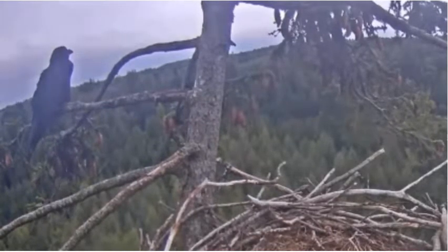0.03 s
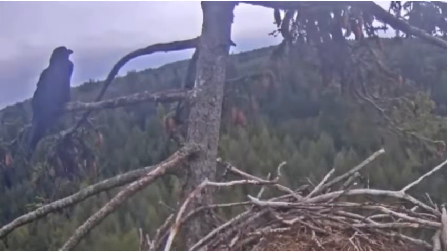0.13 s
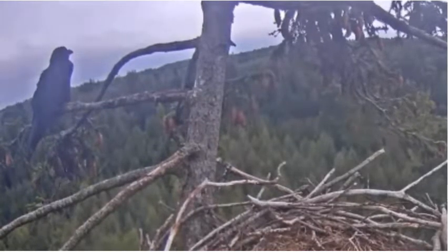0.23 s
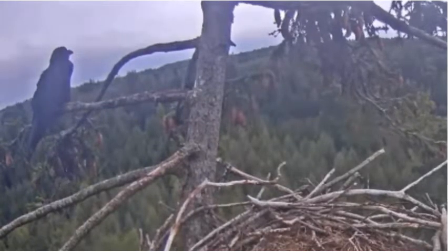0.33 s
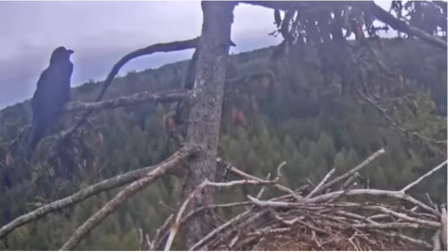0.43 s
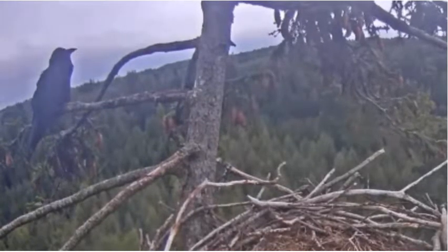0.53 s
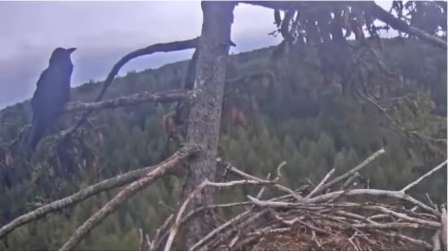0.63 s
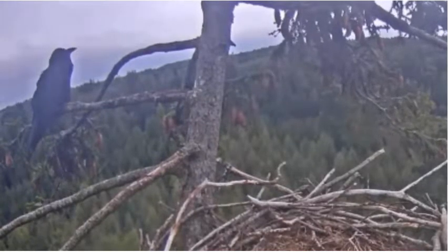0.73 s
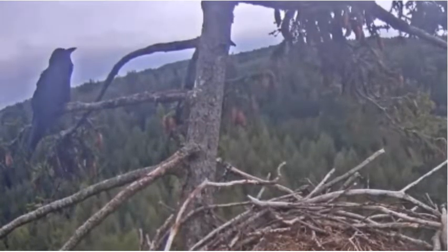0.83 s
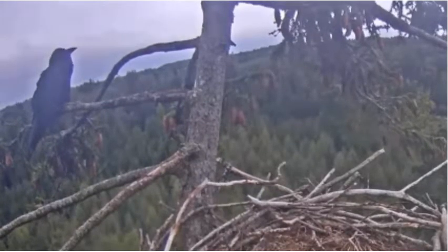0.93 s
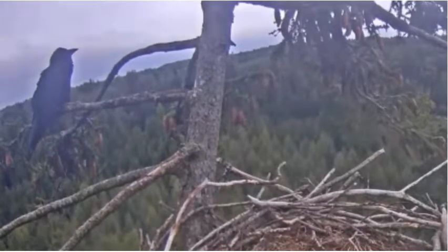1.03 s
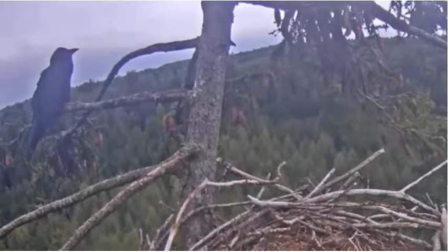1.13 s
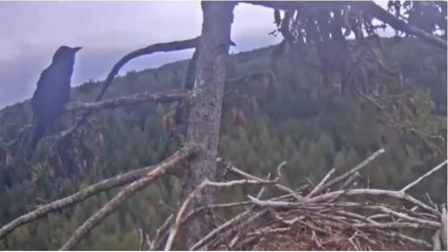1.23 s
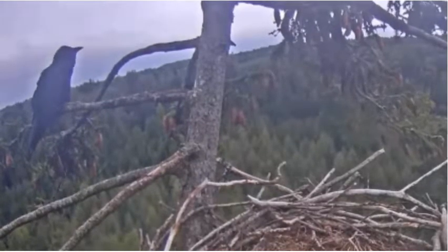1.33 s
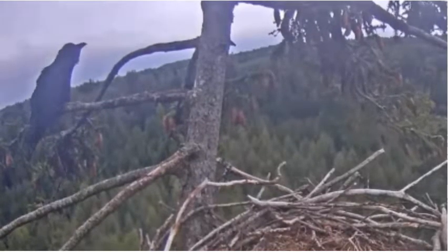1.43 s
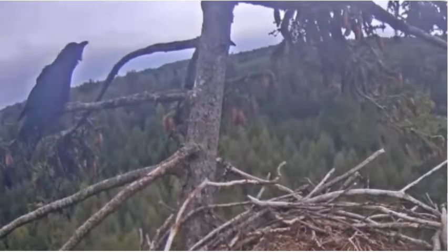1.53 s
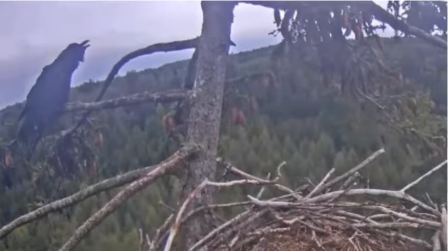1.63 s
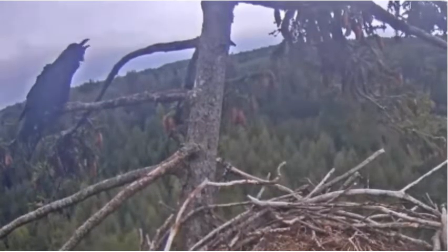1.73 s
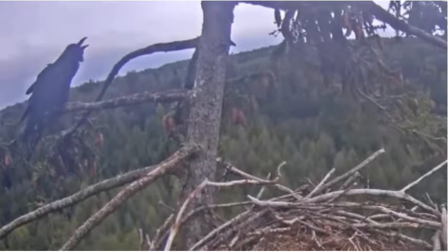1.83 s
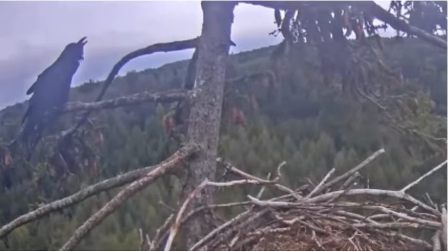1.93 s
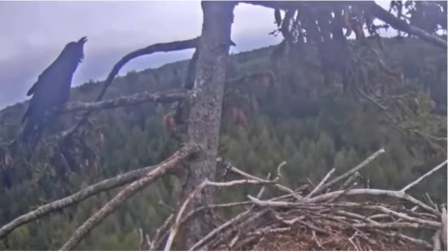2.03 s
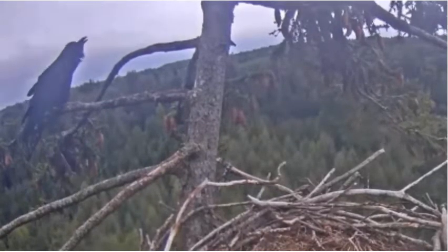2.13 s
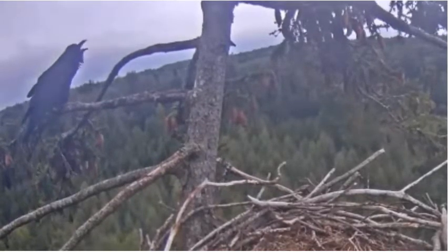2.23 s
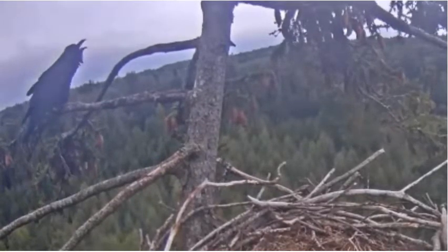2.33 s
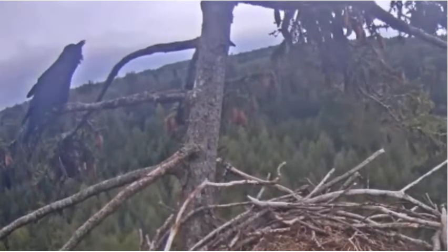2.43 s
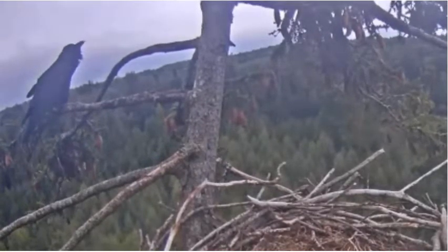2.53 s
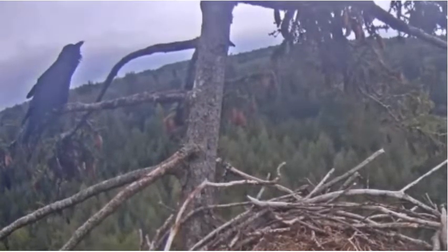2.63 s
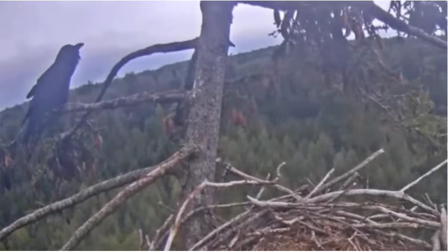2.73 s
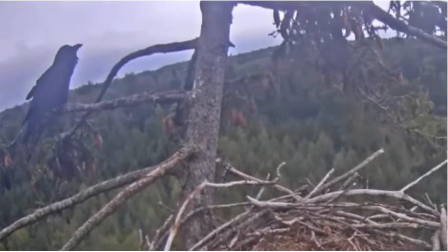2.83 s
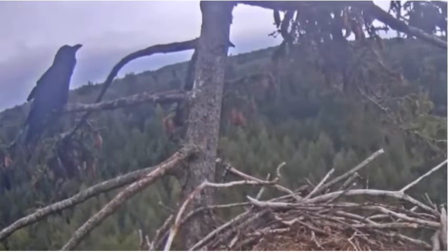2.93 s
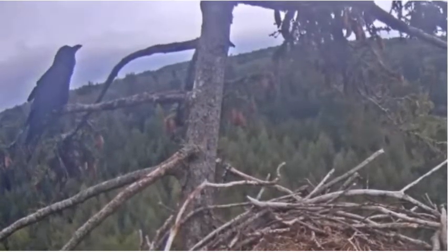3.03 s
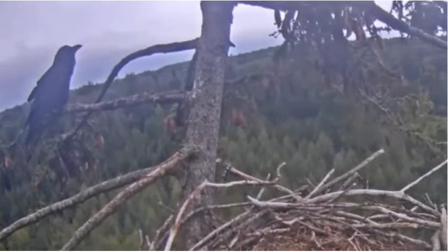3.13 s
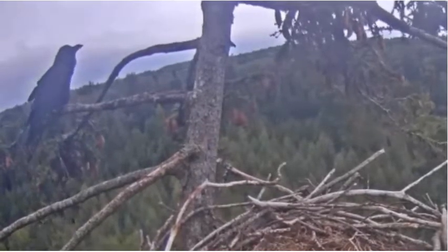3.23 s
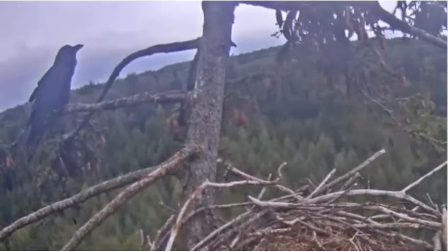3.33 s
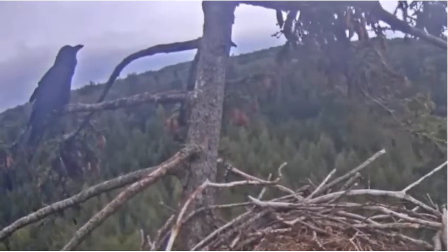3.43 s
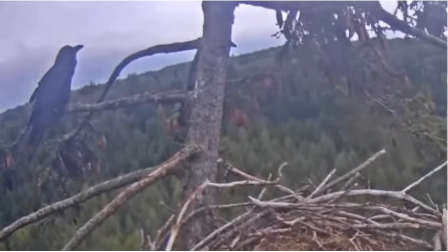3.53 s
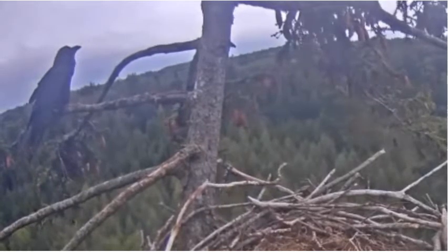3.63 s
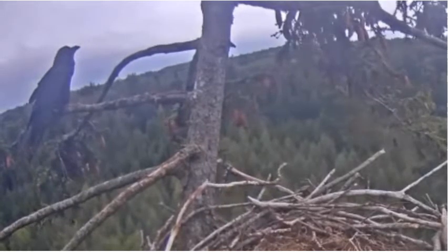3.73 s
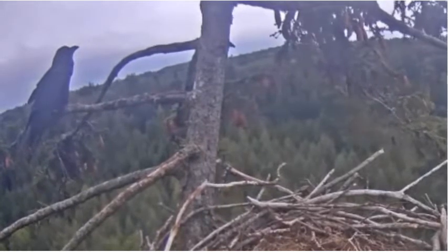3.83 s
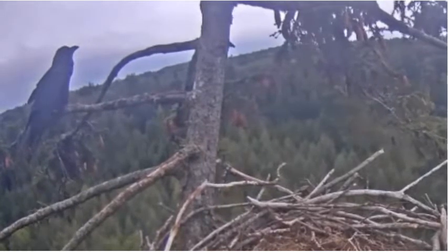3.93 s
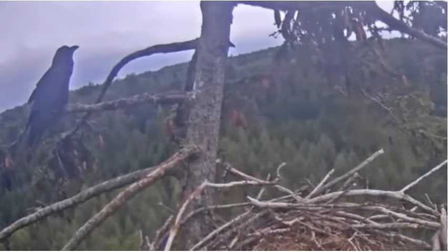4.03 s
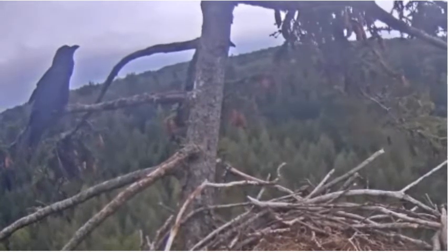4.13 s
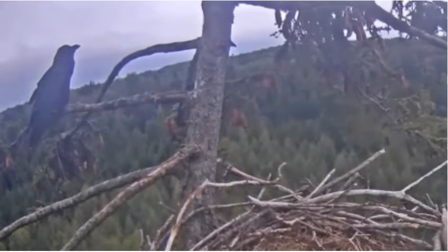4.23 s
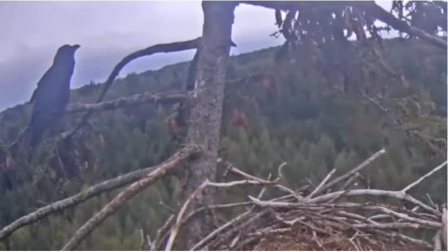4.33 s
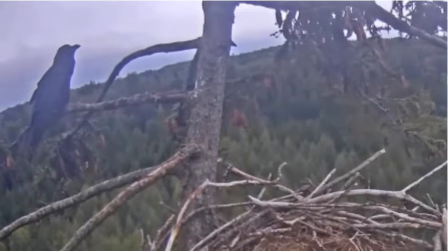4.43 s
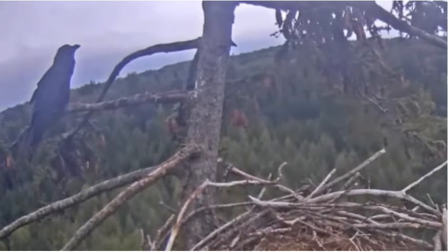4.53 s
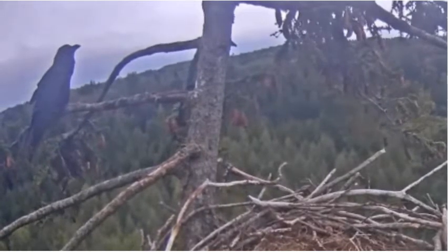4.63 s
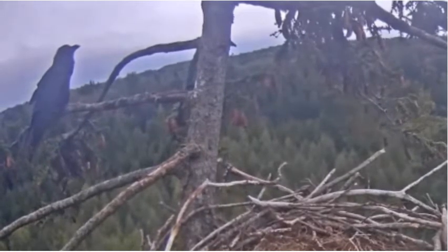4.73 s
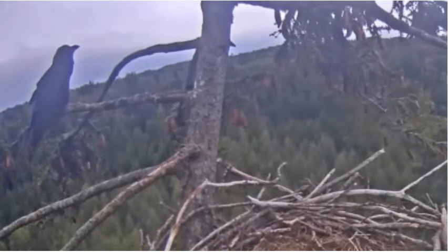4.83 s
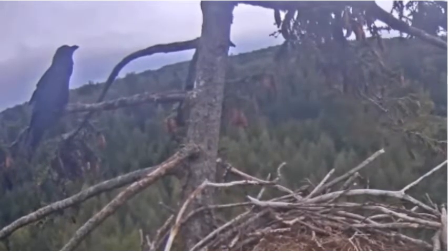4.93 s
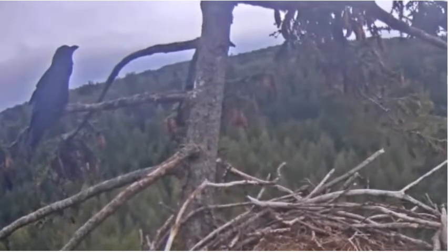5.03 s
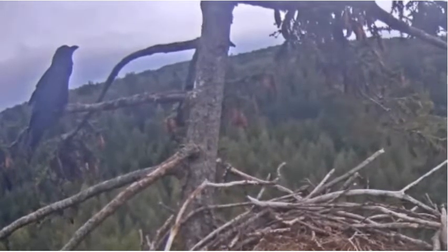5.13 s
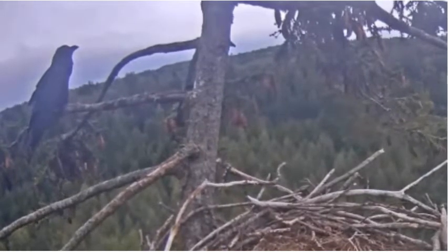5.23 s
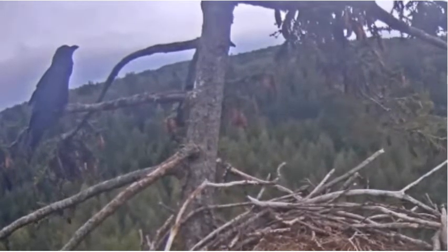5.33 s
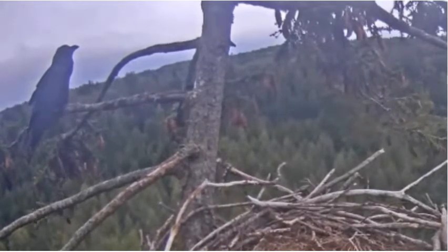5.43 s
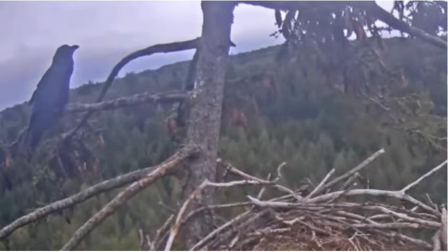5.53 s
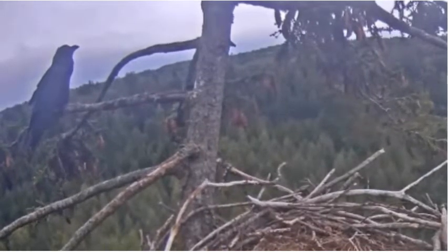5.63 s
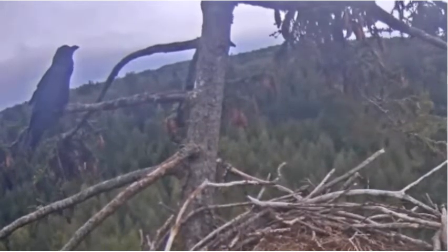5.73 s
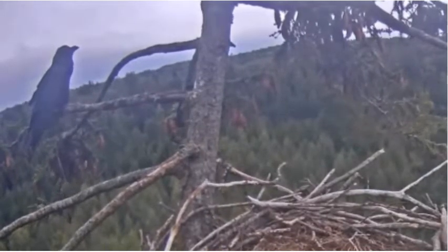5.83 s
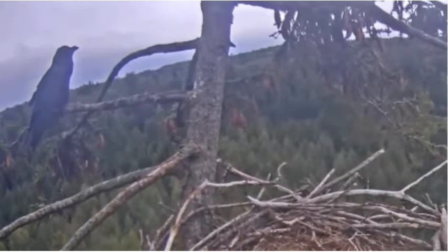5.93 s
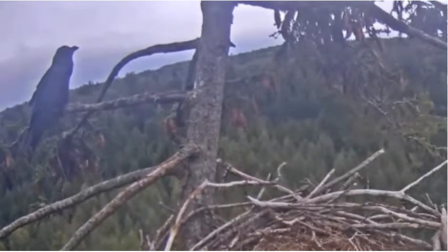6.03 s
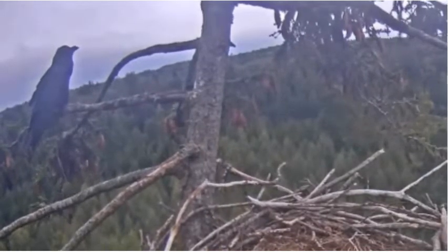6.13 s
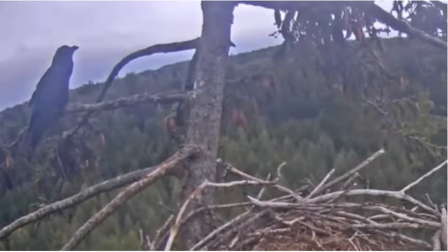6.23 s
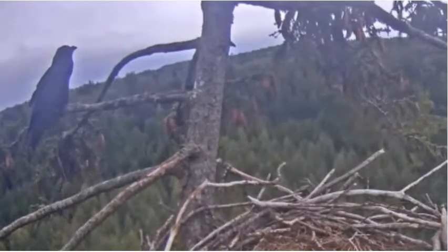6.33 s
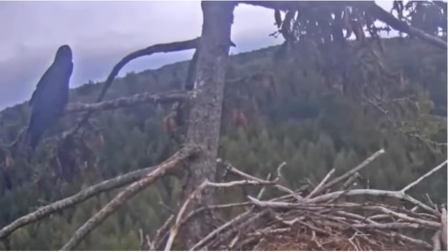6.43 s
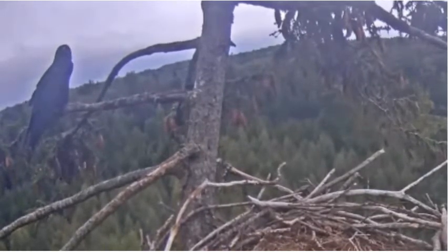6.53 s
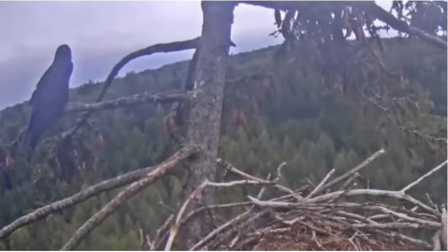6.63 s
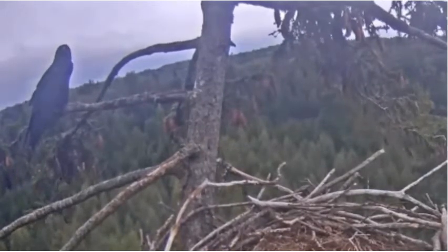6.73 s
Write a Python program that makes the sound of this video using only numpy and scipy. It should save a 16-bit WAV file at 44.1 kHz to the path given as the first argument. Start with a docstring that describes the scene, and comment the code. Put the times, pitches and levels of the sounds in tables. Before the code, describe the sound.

Over constant hiss and wind rumble, a large raven croaks twice loudly, then four times quietly, with short forest echoes trailing.

```python
"""On a forested hillside, a raven on a conifer branch gives two loud croaks, then four softer ones.
A croak is a click and a quick roll of bursts of syrinx pulses that ring the throat, windpipe and beak
and sink in pitch at the end; decaying coloured noise, convolved with each call, is the forest's answer.
Shaped noise gives steady microphone hiss, low wind rumble and rustling trees, louder in one long gust.
A soft low thump comes early, and all sound cuts out twice for a few milliseconds."""
import sys
import numpy as np
from scipy import signal
from scipy.fft import rfft, irfft, next_fast_len
from scipy.io import wavfile
from scipy.ndimage import map_coordinates

SR = 44100
rng = np.random.default_rng(int(sys.argv[2]) if len(sys.argv) > 2 else 0)


def inscribe(sig):
    """Save sig as 16-bit PCM at rate SR to the path in sys.argv[1].

    A 1-D sig is mono; a 2-D sig holds one channel per row.
    Samples are clipped to [-1, 1] before scaling.
    """
    pcm = np.round(np.clip(np.atleast_2d(sig).T, -1, 1) * 32767)
    wavfile.write(sys.argv[1], SR, pcm.astype(np.int16))


N = 298998

# Noise spectra before scaling to rms 1. Each row: frequency in Hz, relative level in dB.
HISS_SPECTRUM = [(71, -38), (120, -14), (283, -5.5), (312, -4.5), (447, -5), (484, -8), (556, -5.5),
                 (1090, -11.5), (1600, -12.5), (2380, -6), (2740, -13.5), (3690, -21), (7260, -25.5),
                 (12700, -26.5), (14000, -30)]
RUMBLE_SPECTRUM = [(7.1, -10.5), (12, 10.5), (25, -7.5), (52, -11), (124, -24), (250, -29.5), (320, -34.5),
                   (550, -120)]
RUSTLE_SPECTRUM = [(60, -40), (150, -14), (450, 2.5), (900, -3.5), (2000, -8.5), (5000, -39)]
# Colour of the scattered echo. Each row: frequency in Hz, relative level in dB.
ECHO_COLOUR = [(200, 2.5), (500, -2.5), (950, -3), (1120, 3.5), (1240, -3), (1500, 2), (1900, 6.5),
               (2800, -4), (5000, -7.5), (10000, -5.5)]
# A brief offset of the signal. One row: start in seconds, length in seconds, peak in dB.
THUMP = (.935, .003, -32)
# Silences. Each row: start in seconds, end in seconds.
DROPOUTS = [(1.958, 1.963), (2.2185, 2.2235)]
# Croaks. Each row: main click in seconds, relative level in dB, relative level of the pulse edges in dB,
# pitch of the roll in Hz, treble gain of the edges in dB, gain reached at the last burst in dB.
LOUD_CROAKS = [(1.868, -6, 0, 486, -1.5, 1), (2.3435, -6.7, 0, 487, -2, -3)]
SOFT_CROAKS = [(3.3275, -21, -1, 486, 1, 0), (3.7295, -21, .5, 483, 0, 0), (4.165, -21, 1.5, 479, -.5, 0),
               (4.6045, -20, 0, 476, -7, 0)]
# Throat resonances. Each row: centre in Hz, width in Hz, gain in dB.
LOUD_THROAT = [(309, 160, -13.5), (1113, 65, -4), (1221, 83, -0.5)]
SOFT_THROAT = [(327, 290, -17.5), (1110, 340, -9), (1202, 103, -1.5)]
# Windpipe and beak resonances, rung by the pulse edges. Each row: centre in Hz, width in Hz, gain in dB.
LOUD_BEAK = [(497, 150, -11), (1050, 73, -17), (1340, 96, -26), (1880, 110, -7), (2480, 210, -21.5),
             (2700, 160, -24), (3710, 200, -29), (4170, 240, -32.5), (4800, 430, -37), (5800, 1100, -37.5)]
SOFT_BEAK = [(490, 130, -13.5), (1550, 250, -25), (1840, 91, -14), (2490, 340, -10), (2723, 83, -4),
             (3810, 310, -18.5), (4260, 250, -22.5), (4690, 300, -20), (5800, 1400, -30.5)]
# What the bird radiates toward the listener. Each row: frequency in Hz, gain in dB.
LOUD_BEAM = [(150, -16), (380, 0), (2850, 0), (3150, -13), (3700, -6), (5000, -8), (6300, -20), (8000, -36)]
SOFT_BEAM = [(150, -12), (380, 0), (2950, 0), (3300, -14), (3750, -2), (5000, -3), (6500, -6), (8000, -24)]

HISS_DB = -50.5
RUMBLE_DB, RUMBLE_GUST_DB = -37, 4  # buffeting in the calm, and what the gust adds
RUSTLE_DB, RUSTLE_GUST_DB = -60, 6.5  # the same for the trees
GUST_START_S, GUST_RISE_S, GUST_HOLD_S, GUST_FALL_S = 2.15, 0.48, 2.3, 1
TOP_HZ = 14250  # upper band limit
NEAR_DB_PER_S, FAR_DB_PER_S = 418, 26  # echo decay from the bird's own tree and from the far slope

REFERENCE_HZ = 478  # rolls are laid out at this pitch, then scaled to the pitch of each croak
LEAD_S = .05  # room kept ahead of the main click
TICK_S = .0265  # a tick comes this long before the main click
STIR_S = 0.0097  # the membranes stir faintly this long before tick and click
CLICK_S = .002  # tick, click and stirs are one clap each, two at most
HELD_PERIOD_S, HELD_BURST_S = .0224, 0.01586  # steady part of the roll: burst spacing and length
END_PERIOD_S, END_BURST_S = .013, 0.0094  # the ending: closer, shorter bursts
HOLD_S = .0655  # from the start of the roll to its ending
SAG_HZ_PER_S = 7090  # sinking of the ending, at the reference pitch
HELD_SLACK, END_SLACK = 0.74, 1  # pitch at the close of a burst over pitch at its start
SWELL_DB = 1.0  # the middle of the steady part over its sides
ONSET_S, ONSET_DB, ONSET_DULL_DB = 0.0058, 4, 10.5  # a burst starts weak and soft-edged
SLACK_DB, SLACK_DULL_DB = 3, 7.5  # and ends so too
JITTER, SHIMMER_DB = .015, 1.1  # scatter of the claps in spacing (share) and size


def amp(db):
    """Logarithmic level: decibels become an amplitude gain."""
    return 10 ** (np.asarray(db) / 20)


def unit(x):
    """Normalisation: the mean power is set to one."""
    return x / np.sqrt(np.mean(x ** 2) + 1e-20)


def colour(points):
    """Spectral envelope: gain interpolated in dB between (Hz, dB) points on a log frequency axis."""
    f, db = np.transpose(points)
    return lambda hz: amp(np.interp(np.log(hz + 1), np.log(f + 1), db))


def filtered(x, response):
    """Linear filtering: the spectrum is multiplied by a response of frequency."""
    m = next_fast_len(len(x) + SR // 4)
    hz = np.fft.rfftfreq(m, 1 / SR)
    return irfft(rfft(x, m) * response(hz), m)[:len(x)]


def noise(spectrum):
    """Coloured noise: white noise shaped by a spectrum, at rms 1."""
    return unit(filtered(rng.standard_normal(N), colour(spectrum)))


def wobble(rate):
    """Slow fluctuation: a smooth curve through random knots, rate a second."""
    knots = rng.standard_normal(int(N * rate / SR) + 4)
    return map_coordinates(knots, [np.arange(N) * rate / SR])


def add(track, s, sound):
    """Superposition: a sound is summed into the track from time s."""
    part = track[round(s * SR):][:len(sound)]
    part += sound[:len(part)]


def background():
    """Broadband noise: steady microphone hiss, with wind that buffets the housing and stirs the trees."""
    corners = np.cumsum([GUST_START_S, GUST_RISE_S, GUST_HOLD_S, GUST_FALL_S])
    gust = np.interp(np.arange(N) / SR, corners, [0, 1, 1, 0])
    flutter_db = .8 * wobble(7)
    hiss = amp(HISS_DB) * noise(HISS_SPECTRUM)
    rumble = amp(RUMBLE_DB + RUMBLE_GUST_DB * gust + flutter_db) * noise(RUMBLE_SPECTRUM)
    rustle = amp(RUSTLE_DB + RUSTLE_GUST_DB * gust) * noise(RUSTLE_SPECTRUM)
    return hiss + rumble + rustle


def thump():
    """Step offset: a brief negative shift of the signal is heard as a soft low thump."""
    s, length, db = THUMP
    t = np.arange(N) / SR
    return -amp(db) * ((t > s) & (t < s + length))


def echo_shape(near_db, trees_s, trees_spread, far_db):
    """Scattered energy adds in power: the bird's tree, a swell from trees around, a faint far slope."""
    t = (np.arange(SR) + 1) / SR
    near = amp(near_db - NEAR_DB_PER_S * t)
    trees = np.exp(-.5 * (np.log(t / trees_s) / trees_spread) ** 2)
    far = amp(far_db - FAR_DB_PER_S * t)
    return np.sqrt(near ** 2 + trees ** 2 + far ** 2)


def forest(call, echo):
    """Diffuse reflection: trunks and slope return the call as convolution with decaying noise."""
    scatter = filtered(rng.standard_normal(SR), colour(ECHO_COLOUR))
    tail = unit(scatter * echo)
    return signal.fftconvolve(call, tail / np.sqrt(SR))


def branches(call):
    """Near scattering: twigs and bark smear the treble of each clap over a few milliseconds."""
    t = np.arange(SR // 50) / SR
    scatter = rng.standard_normal(len(t)) * amp(-60 * t / .025)
    near = signal.fftconvolve(call, scatter / np.linalg.norm(scatter))[:len(call)]
    return call + filtered(near, colour([(1200, -18), (4000, -4)]))


def resonances(modes):
    """Parallel resonators: the responses of (Hz, width, dB) modes are summed, each with steep skirts."""
    def response(hz):
        total = 0
        for centre, width, db in modes:
            skirt = 1 / (1 + (np.log(hz / centre + 1e-6) / .55) ** 4)
            damping = 1j * hz * width
            total = total + amp(db) * skirt * damping / (centre * centre - hz * hz + damping)
        return total
    return response


def pulses(times, sizes):
    """Band-limited impulses: windowed sincs place each one between the samples of a one-second signal."""
    at = np.floor(times * SR).astype(int)[:, None] + np.arange(-8, 9)
    off = at - times[:, None] * SR
    shape = np.sinc(off) * np.sinc(off / 9)
    return np.bincount(at.ravel(), (sizes[:, None] * shape).ravel(), SR)


# The three functions below list bursts. Each row: delay from the main click in seconds, length in seconds,
# pitch at the start in Hz, pitch at the close in Hz, level in dB, edge level in dB.
def clicks(tick_db, tick_edge_db, click_db, click_edge_db, stir_db):
    """Transient onset: a tick and the main click open a croak, each after a faint stir."""
    hz = REFERENCE_HZ * END_SLACK
    bursts = []
    for delay, db, edge_db in [(-TICK_S, tick_db, tick_edge_db), (0, click_db, click_edge_db)]:
        bursts.append((delay - STIR_S, CLICK_S, hz, hz, db + stir_db, edge_db))
        bursts.append((delay, CLICK_S, hz, hz, db, edge_db))
    return bursts


def held_bursts(start_s, db, grow_db, edge_db, brighten_db, count):
    """Periodic modulation: evenly spaced bursts arch in level and drift in level and brightness."""
    bursts = []
    for k, side in enumerate(np.linspace(-1, 1, count)):
        level_db = db + grow_db * side - SWELL_DB * side ** 2
        bursts.append((start_s + k * HELD_PERIOD_S, HELD_BURST_S, REFERENCE_HZ, REFERENCE_HZ * HELD_SLACK,
                       level_db, edge_db + brighten_db * side))
    return bursts


def sinking_bursts(start_s, db, edge_db, fade_db, count):
    """Falling tension: after the hold the bursts crowd together, sink in pitch and fade ever faster."""
    pitches = REFERENCE_HZ - SAG_HZ_PER_S * END_PERIOD_S * (np.arange(count) + 1)
    return [(start_s + HOLD_S + k * END_PERIOD_S, END_BURST_S, hz, hz * END_SLACK,
             db - fade_db * k ** 2, edge_db)
            for k, hz in enumerate(pitches)]


def syrinx(roll, pitch_hz, ending_db):
    """Self-oscillation: membranes clap irregularly in bursts; gives rows of time in s, level, edge in dB."""
    claps = []
    last_delay = roll[-1][0]
    for delay, length, held_hz, last_hz, db, edge_db in roll:
        t = 0
        late = max(delay / last_delay, 0) ** 2
        for slip, scatter_db in rng.standard_normal(size=(16, 2)) * [JITTER, SHIMMER_DB]:
            if t >= length:
                break
            slack = (t / length) ** 5  # as a burst ends the membranes slacken
            onset = np.exp(-t / ONSET_S)
            weak_db = SLACK_DB * slack + ONSET_DB * onset
            dull_db = SLACK_DULL_DB * slack + ONSET_DULL_DB * onset
            level_db = db + ending_db * late + scatter_db - weak_db
            claps.append((LEAD_S + delay + t, level_db, edge_db - dull_db))
            clap_hz = (held_hz + (last_hz - held_hz) * slack) * pitch_hz / REFERENCE_HZ
            t += (1 + slip) / clap_hz
    return np.transpose(claps)


def voice(claps, throat, beak, treble_db, rasp):
    """Source and filter: claps ring the throat; their edges, with rasping air, ring windpipe and beak."""
    s, db, edge_db = claps
    edge = pulses(s, amp(db + edge_db))
    air_decay = np.exp(-1 / (0.0041 * SR))  # 4.1 ms time constant
    puffs = signal.lfilter([1], [1, -air_decay], edge) * rng.standard_normal(SR)
    edge = edge + rasp * filtered(puffs, colour([(1500, -3), (4000, 9.5)]))

    def beak_response(hz):
        treble = 1 / (1 + (3300 / (hz + 1)) ** 12)  # rises to 1 above 3300 Hz
        return resonances(beak)(hz) * amp(treble_db * treble)

    throat_sound = filtered(pulses(s, amp(db)), resonances(throat))
    return throat_sound + filtered(edge, beak_response)


def croaks(table, roll, throat, beak, beam, echo, rasp, echo_db):
    """Direct and reflected paths: each croak arrives through the branches, then from the forest."""
    track = np.zeros(N)
    for s, db, edge_db, pitch_hz, treble_db, ending_db in table:
        claps = syrinx(roll, pitch_hz, ending_db) + [[0], [db], [edge_db]]
        sound = voice(claps, throat, beak, treble_db, rasp)
        call = amp(32) * filtered(sound, colour(beam))
        add(track, s - LEAD_S, branches(call))
        add(track, s - LEAD_S, amp(echo_db) * forest(call, echo))
    return track


def soft_croaks():
    """Weaker drive: thinner, brighter croaks that stand out less from their echo."""
    start_s = .015
    roll = (clicks(tick_db=-6.5, tick_edge_db=-11, click_db=0.5, click_edge_db=7.5, stir_db=-13)
            + held_bursts(start_s, db=-2.0, grow_db=-0.5, edge_db=-4.5, brighten_db=-.2, count=3)
            + sinking_bursts(start_s, db=-1.0, edge_db=-8.5, fade_db=3.5, count=2))
    echo = echo_shape(near_db=3.5, trees_s=0.078, trees_spread=0.42, far_db=-9.0)
    return croaks(SOFT_CROAKS, roll, SOFT_THROAT, SOFT_BEAK, SOFT_BEAM, echo, rasp=0.034, echo_db=-11.0)


def loud_croaks():
    """Strong drive: full, dark croaks with the beak wide open."""
    start_s = .0135
    roll = (clicks(tick_db=-5.5, tick_edge_db=2, click_db=2.0, click_edge_db=2.5, stir_db=-16)
            + held_bursts(start_s, db=0, grow_db=0.2, edge_db=-6, brighten_db=0.5, count=3)
            + sinking_bursts(start_s, db=.5, edge_db=-4.5, fade_db=3.0, count=3))
    echo = echo_shape(near_db=16.5, trees_s=0.14, trees_spread=0.54, far_db=-7)
    return croaks(LOUD_CROAKS, roll, LOUD_THROAT, LOUD_BEAK, LOUD_BEAM, echo, rasp=0.066, echo_db=-21.5)


def scene():
    """Superposition: the raven's calls sum with the noise of the quiet hillside."""
    return (background() + thump() + soft_croaks() + loud_croaks())[None]


def record(dry):
    """Gating and band limiting: the sound cuts out twice, and a steep low-pass removes the top."""
    t = np.arange(N) / SR
    live = np.all([(t < start) | (t > end) for start, end in DROPOUTS], axis=0)
    return filtered(dry[0] * live, lambda hz: 1 / (1 + (hz / TOP_HZ) ** 160))[None]


dry = scene()
out = record(dry)
inscribe(out)
```